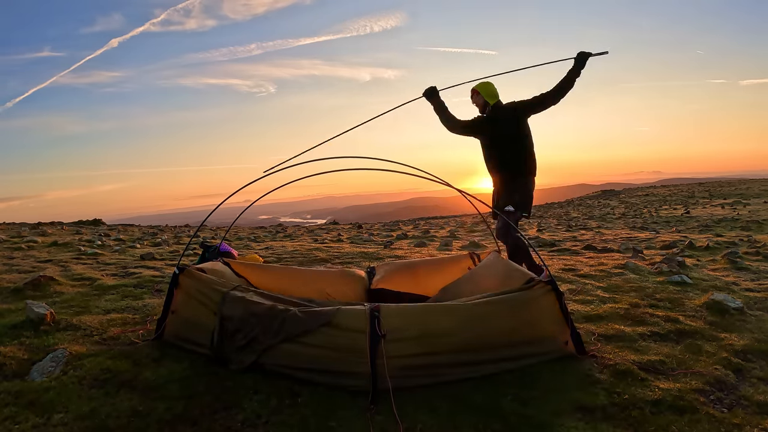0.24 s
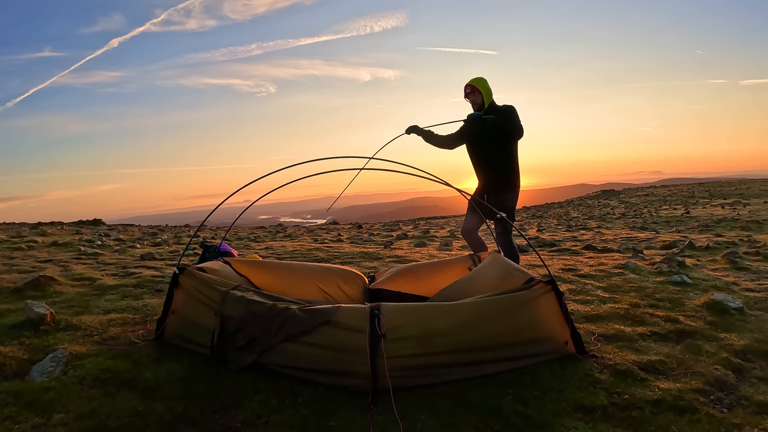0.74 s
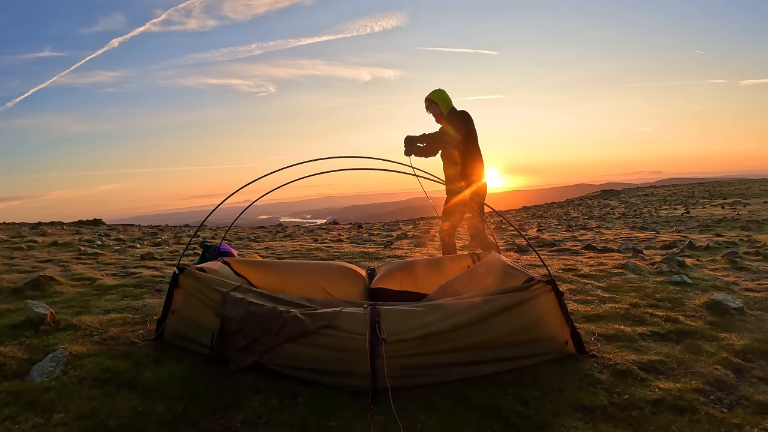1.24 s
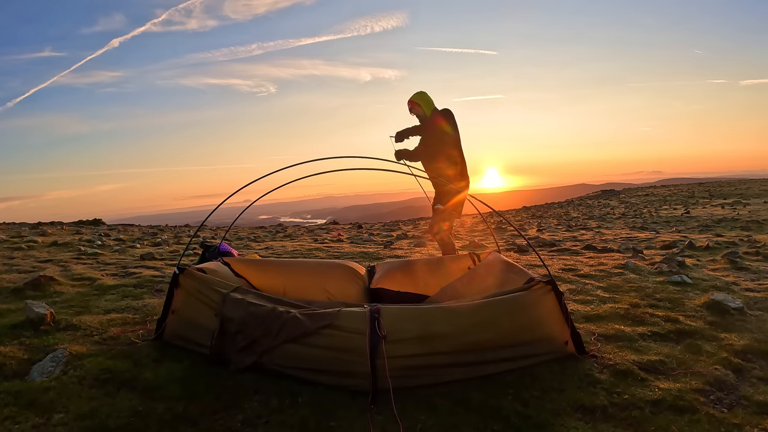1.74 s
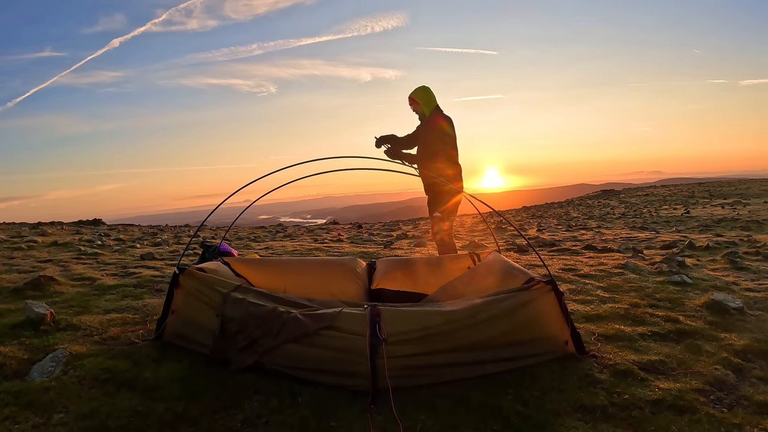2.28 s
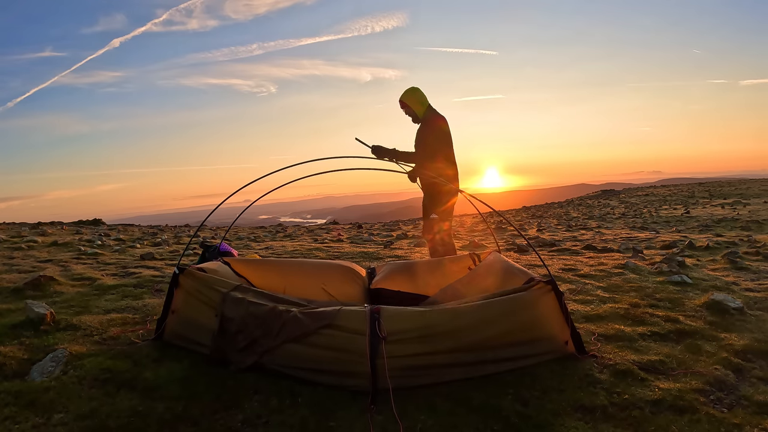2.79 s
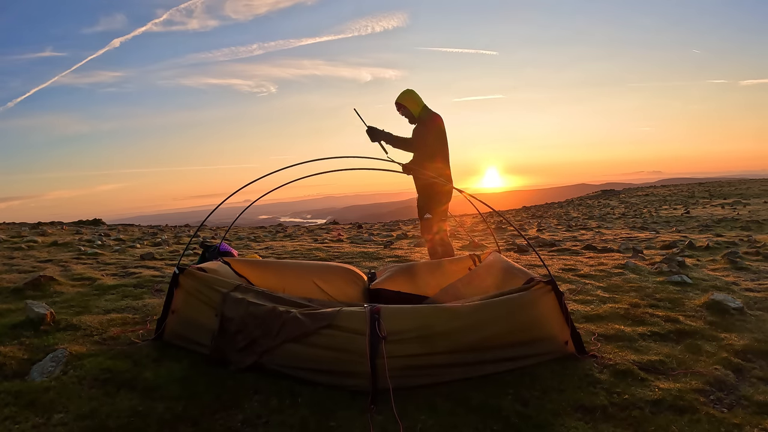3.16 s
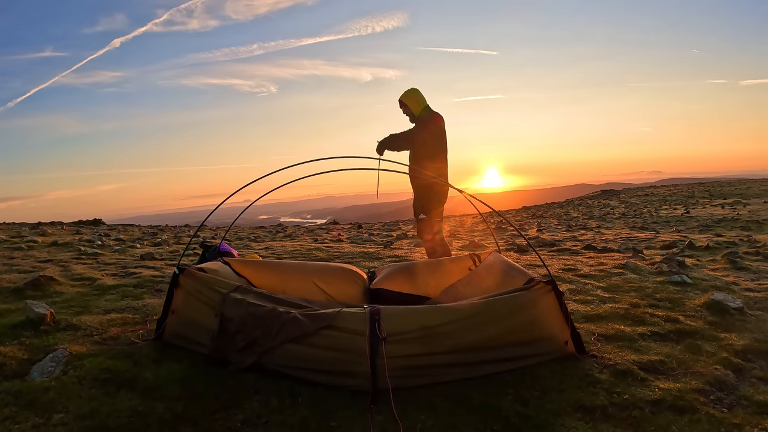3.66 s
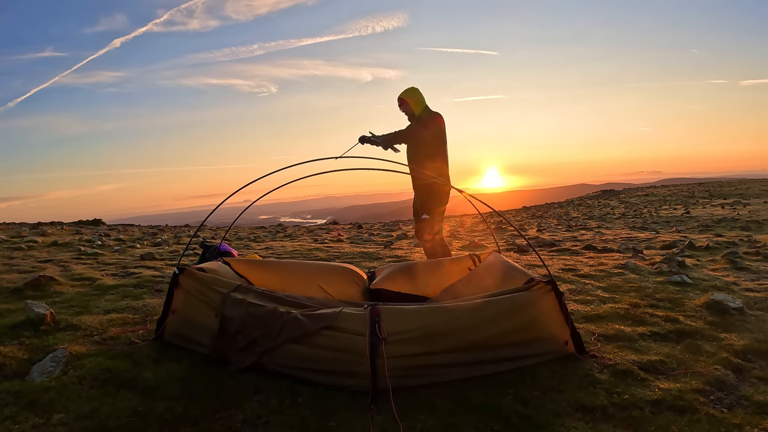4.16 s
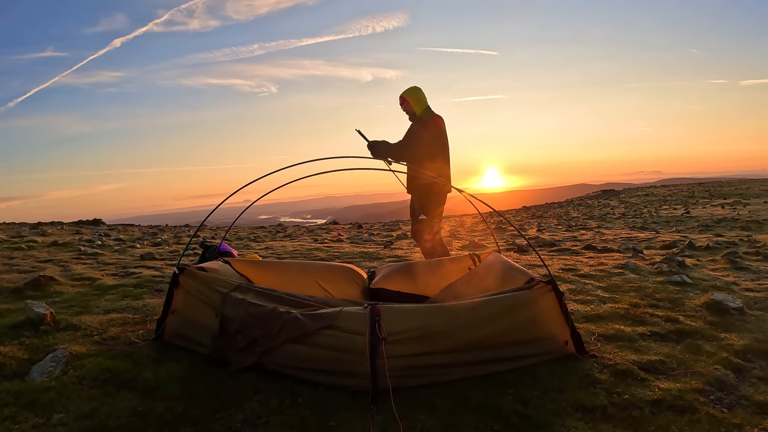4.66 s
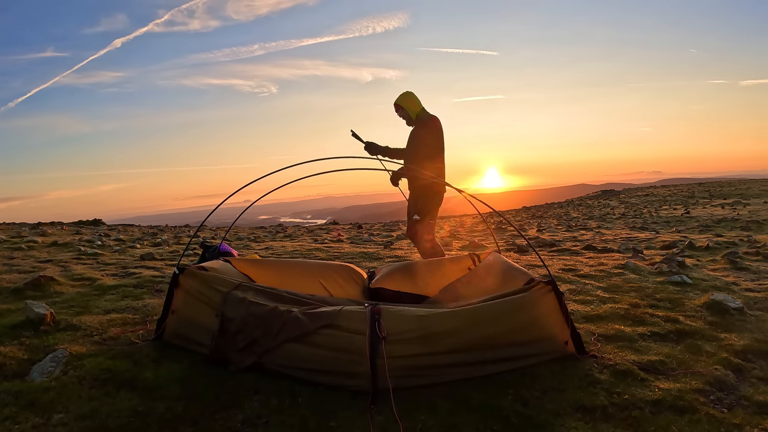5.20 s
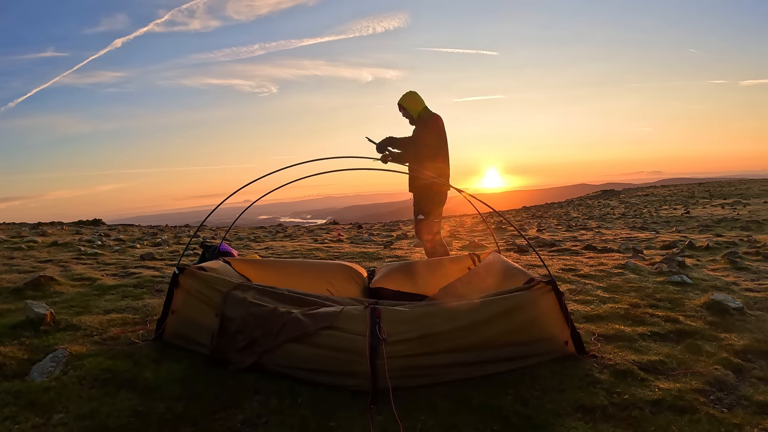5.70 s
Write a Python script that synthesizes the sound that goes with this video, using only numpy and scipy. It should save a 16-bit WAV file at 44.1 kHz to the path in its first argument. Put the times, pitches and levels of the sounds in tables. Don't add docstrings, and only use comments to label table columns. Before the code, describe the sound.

Bright, dry clicks of hollow metal tubes knocking together outdoors, growing busier towards the end, with lumpy wind rumble on the microphone and small bird whistles.

```python
import sys
import numpy as np
from scipy import signal
from scipy.fft import rfft, irfft
from scipy.io import wavfile
from scipy.ndimage import uniform_filter1d

SR = 44100
rng = np.random.default_rng(int(sys.argv[2]) if len(sys.argv) > 2 else 0)


def persist_wave(psi):
    counts = np.round(np.clip(psi, -1, 1) * 32767).astype(np.int16)
    wavfile.write(sys.argv[1], SR, np.atleast_2d(counts).T)


def amplitude_ratio(level_db):
    exponent = np.asarray(level_db, float) / 20
    return 10 ** exponent


N = 261954

# (time [s], peak level [dB], half length [s], left-right [dB])
GUSTS = [(0.015, -25, 0.059, -2), (0.158, -24, 0.045, -4.5), (0.286, -26.5, 0.074, -7),
         (0.575, -24.5, 0.24, -3.5), (0.864, -25.5, 0.046, -6), (0.994, -30.5, 0.091, -4.5),
         (1.198, -33, 0.15, -4), (1.473, -33, 0.12, -2), (1.818, -28.5, 0.057, 0), (1.967, -28, 0.059, -5),
         (2.124, -27.5, 0.052, -3), (2.218, -35, 0.06, -1), (2.567, -37, 0.079, -3),
         (3.006, -43.5, 0.34, -1), (3.314, -37, 0.038, 1), (3.583, -28, 0.047, -3),
         (3.734, -33.5, 0.076, -1), (4.028, -28, 0.11, -2.5), (4.232, -31, 0.068, 3),
         (4.415, -23, 0.09, -4.5), (4.67, -41, 0.24, 5), (4.958, -23, 0.056, -4.5), (5.19, -29, 0.05, -1),
         (5.317, -21.5, 0.079, -4.5), (5.377, -23, 0.023, -3), (5.483, -20, 0.094, -4),
         (5.617, -23.5, 0.058, -6.5), (5.681, -24, 0.03, -1), (5.801, -24.5, 0.044, -7),
         (5.895, -23, 0.048, -7.5)]
# (time [s], pitch [Hz], peak level [dB])
EDDIES = [
    (0.264, 152, -21.5),
    (1.833, 146, -34),
    (1.946, 164, -19),
    (1.256, 200, -28),
    (4.238, 92, -21.5),
    (4.45, 88, -25),
    (5.365, 134, -23),
    (5.448, 146, -9),
]
# (frequency [Hz], level [dB per Hz])
BUFFET_COLOUR = [(24, -70), (40, -45), (56, -14), (67, 0.5), (96, 7.5), (270, -6), (446, -25), (632, -32),
                 (981, -34), (1350, -33.5), (1500, -42), (1950, -39), (3300, -120)]
# (frequency [Hz], level [dB per Hz])
HISS_COLOUR = [(210, -42), (350, -3), (453, -3), (700, -4), (877, -4.5), (1210, -1), (2230, -6), (2940, -8),
               (3510, -11.5), (4920, -3.5), (7490, -4.5), (9690, -11.5), (10700, -25.5), (15200, -32),
               (16500, -37.5)]
# (time [s], level [dB])
RUSTLE = [(0.0, -43.5), (0.15, -51), (1.09, -53), (1.54, -52), (1.7, -56.5), (1.95, -58), (2.2, -54),
          (2.91, -55), (3.09, -59.5), (3.8, -53.5), (4.33, -56.5), (4.68, -56.5), (4.88, -52.5),
          (5.06, -72), (5.29, -52.5), (5.49, -53), (5.62, -61.5), (5.94, -55.5)]
# (frequency [Hz], likeness [0-1])
PORT_LIKENESS = [(60, 0.54), (300, 0.27), (640, 0.17), (1400, 0.33), (3100, 0.17), (6800, 0.65),
                 (15000, 0.1)]
# (frequency [Hz], left-right [dB])
PORT_LEAN = [(60, -13), (640, -5.5), (2000, -1.5), (5000, -1), (12000, 1.5)]
# (frequency [Hz], phase [radians])
PORT_LEAD = [(260, -1.3), (1200, -0.29), (2900, -0.86), (5000, -0.58), (10600, -0.46), (13000, -1.8)]
# (frequency [Hz], width [Hz], depth [0-1])
HOUSING_DIPS = [
    (3470, 240, 1),
    (3990, 120, .9),
]
# (frequency [Hz], level [dB], decay over 60 dB [s])
LOW_MODES = [(1140, -14, 0.022), (1602, -9.5, 0.023), (2100, 3.5, 0.0056), (2563, 3, 0.012),
             (2894, -4.5, 0.019), (3340, -18, 0.0078)]
# (frequency [Hz], level [dB], decay over 60 dB [s])
HIGH_MODES = [(3750, -12.5, 0.005), (4370, 2.5, 0.007), (4650, -6, 0.025), (5224, -0.5, 0.013),
              (5500, 3, 0.018), (6540, 6.5, 0.01), (6050, 7, 0.0075), (6970, 8, 0.0054), (7470, -2, 0.02),
              (7430, -19, 0.013), (7650, -48, 0.0054), (8800, -9, 0.0032), (9300, 7, 0.0093),
              (10400, -35, 0.0058), (11520, 3, 0.0089), (11600, -1, 0.0072), (14300, -4, 0.006),
              (14900, -27, .006)]
# (time [s], length [s], rms level [dB], favoured ring [Hz], low modes relative [dB])
SCRAPES = [(0.0, 0.057, -54.5, 960, 15.5), (0.0, 0.039, -54, 1244, 17.5), (0.0, 0.037, -59.5, 2680, 22.5),
           (4.868, 0.013, -59.5, 1090, 12), (1.113, 0.059, -62, 1200, 8), (4.442, 0.068, -38.5, 7500, -26),
           (5.418, 0.0075, -70, 3750, 12.5), (0.058, 0.07, -46, 7000, -5), (1.651, 0.041, -49, 1900, 4),
           (2.137, 0.021, -36.5, 3150, 1.5), (2.15, 0.02, -34.5, 6070, -11), (2.153, 0.017, -41, 3030, 3),
           (2.174, 0.018, -39.5, 5150, -10), (2.193, 0.039, -45.5, 4560, -6.5),
           (2.976, 0.074, -48, 5800, -11), (3.588, 0.064, -48.5, 2950, 1.5), (4.464, 0.027, -45, 5800, -25),
           (4.789, 0.1, -44.5, 6500, -41), (4.862, 0.11, -45.5, 6200, -12),
           (4.966, 0.09, -41.5, 6500, -7.5), (5.328, 0.021, -46, 5840, -3.5),
           (5.435, 0.022, -46.5, 8200, -24)]
# (time [s], peak level [dB], favoured ring [Hz], low modes relative [dB], chatter length [ms])
CLACKS = [(.0847, -18, 7640, -29, 1.4), (1.5828, -16, 6800, -8, 2.4), (1.6572, -21, 2000, 0, 4.7),
          (1.6722, -18.5, 2100, 19, 1.9), (2.1127, -3, 4500, -11, 1.3), (2.1708, -13.5, 7200, -1.5, 1.6),
          (2.3843, -7.5, 5530, -18, 2.5), (2.6205, -11, 4310, -11.5, 2.4), (2.6682, -12.5, 4300, -13, 2.2),
          (2.83, -10.5, 5430, -18.5, 1.1), (3.4286, -9, 6150, -9.5, 1.5), (3.6015, -15.5, 2830, 0, 3.5),
          (3.7428, -3.5, 5800, -17.5, 2.9), (4.2006, -5.5, 7140, -9.5, 1.37), (4.453, -5, 5830, -24, 3.1),
          (4.4657, -14, 2970, 1, 1.3), (4.5304, -2.5, 7120, -18, 1.06), (4.8327, -9, 5600, -21.5, 1.5),
          (4.8503, -5, 5500, -20.5, 1.6), (4.9957, 2, 6170, -21, 0.97), (5.0206, -8, 5200, -21.5, 1.46),
          (5.0511, 9, 6850, -27.5, .8), (5.3427, -8.5, 5230, -23.5, 1.6), (5.673, -21.5, 2300, -4, 0.97)]
# (time [s], peak level [dB], favoured ring [Hz])
TINKS = [(.129, -27.5, 6930), (1.3632, -33, 6260), (1.6333, -30.5, 5800), (1.692, -29, 6050),
         (2.118, -10, 4300), (2.329, -32, 7360), (2.4, -27, 5800), (2.4317, -25.5, 5260),
         (2.5748, -27.5, 6100), (2.6533, -25, 4970), (3, -39, 7600), (3.0033, -27, 5940),
         (3.025, -23, 7040), (3.6766, -24, 5650), (3.762, -19.5, 7240), (3.8337, -30.5, 6170),
         (4.4708, -16.5, 9000), (4.563, -27, 7560), (4.5959, -20.5, 6460), (4.8886, -24, 6000),
         (4.9194, -23, 6600), (4.9324, -19.5, 5200), (4.953, -28, 6700), (4.973, -31, 6000),
         (5.069, -52, 7300), (5.3354, -30, 4800), (5.355, -28, 5210), (5.448, -25.5, 5800),
         (5.6, -27, 7700), (5.9148, -22.5, 5160)]
# (time [s], peak level [dB], favoured ring [Hz])
TAPS = [(0.3419, -32.5, 1170), (1.7054, -49, 1120), (1.747, -27, 2250), (1.806, -39, 2180),
        (1.8843, -37.5, 2250), (1.9223, -36, 2130), (1.972, -34, 2220), (3.6414, -22.5, 1590),
        (4.519, -32, 2370), (5.275, -39, 1230), (5.829, -22.5, 2230)]
# (time [s], peak level [dB], favoured ring [Hz], low modes relative [dB])
REBOUNDS = [(1.585, -12, 6740, -13.5), (1.6703, -21, 2100, 16), (2.1646, -10.5, 3100, 10),
            (2.1565, -18, 5230, -16), (2.199, -30, 7300, -20), (2.3869, -3.5, 5860, -19),
            (2.3893, -13.5, 5700, -16), (2.6228, -12, 6140, -17), (2.6705, -13, 5550, -14),
            (2.833, -19, 1430, 0), (2.838, -28, 6000, -11), (2.9807, -27, 5640, -23),
            (2.985, -30, 5130, -20), (3.0093, -27, 6200, -25), (3.0249, -28, 1640, 16),
            (3.604, -15.5, 5430, -13), (3.7455, -6.5, 6950, -15), (3.7543, -18, 7200, -25),
            (3.7567, -20, 7200, -25), (4.2028, -7.5, 2370, 8), (4.2205, -28, 7000, -20),
            (4.4539, -3.5, 7250, -16.5), (4.458, -10, 5800, -22), (4.5324, -15, 2490, -7),
            (4.854, -11, 5500, -13.5), (5.277, -27.5, 1200, 16), (4.8123, -27, 6640, -22),
            (5.001, -16, 6300, -18), (5.0558, -16, 5300, -19), (5.344, -3, 6770, -24),
            (5.346, -15, 5240, -25), (3.4302, -14.5, 4200, -8), (2.137, -20, 5680, -6),
            (2.1505, -20, 6100, -6), (4.9974, -13, 9300, -12), (4.8345, -20, 2900, -5),
            (4.4725, -20, 9000, -12), (1.658, -24, 2120, 10)]
# (start [s], end [s], centre [Hz], width [Hz], rms level [dB])
SWISH = (.62, .785, 1380, 260, -47)
# (time [s], pitch [Hz], rms level [dB])
BIRD_CALLS = [
    [(1.528, 6000, -56), (1.54, 7000, -54), (1.552, 6560, -46), (1.565, 6750, -47), (1.58, 7100, -49),
     (1.59, 6500, -60)],
    [(3.227, 5850, -44), (3.246, 7100, -35.5), (3.253, 6470, -36), (3.259, 7300, -43), (3.271, 6600, -33),
     (3.283, 7100, -44), (3.292, 6480, -33), (3.299, 5100, -52)],
    [(3.374, 5700, -45), (3.392, 6600, -38), (3.41, 6230, -37), (3.43, 7100, -55), (3.445, 7300, -44),
     (3.45, 6230, -50)],
    [(4.595, 6050, -45), (4.62, 6700, -34), (4.628, 6260, -36), (4.649, 7230, -37.5), (4.66, 5600, -39)],
]
# (start [s], end [s], level against bass [dB])
SEAMS = [
    (1.76, 1.84, -36),
    (4.25, 4.414, -31),
    (5.1, 5.268, -33),
    (5.357, 5.663, -44),
    (5.735, 5.828, -35),
]


def evened(x):
    return x / np.sqrt(np.mean(x ** 2) + 1e-20)


def read(points, hz):
    f, value = np.transpose(points)
    return np.interp(np.log(hz + 1), np.log(f + 1), value)


def add(mix, s, sound):
    part = mix[max(round(s * SR), 0):][:len(sound)]
    part += sound[:len(part)]


def butter(x, order, hz, kind):
    return signal.sosfilt(signal.butter(order, hz, kind, fs=SR, output="sos"), x)


def tukey_fade(x, share):
    return x * signal.windows.tukey(len(x), share)


def gusts(t):
    lull_db, lull_pan_db = -42, -5.5
    s, db, half, pan_db = np.transpose(GUSTS)[:, :, None]
    power = amplitude_ratio(db) ** 2 * np.exp(-((t - s) / np.maximum(half, .01)) ** 2 * 1.52)
    lull = amplitude_ratio(lull_db) ** 2
    total = power.sum(0) + lull
    return 10 * np.log10(total), ((power * pan_db).sum(0) + lull * lull_pan_db) / total


def port_noise(size, level_db, pan_db, patch_db, flicker_db):
    hop = size // 4
    frames = N // hop + 5
    hz = np.fft.rfftfreq(size, 1 / SR)[:, None]
    t = np.arange(frames) * hop / SR
    a, b, c, d, patches = rng.standard_normal((frames, len(hz), 5)).T
    patches = uniform_filter1d(patches, size=9, axis=0)
    patches = evened(uniform_filter1d(patches, size=6, axis=1))
    flicker = evened(uniform_filter1d(rng.standard_normal(frames), size=3))
    same = np.clip(read(PORT_LIKENESS, hz), -1, 1)
    left = a + 1j * b
    right = same * left + np.sqrt(1 - same ** 2) * (c + 1j * d)
    db = level_db(hz, t) + patch_db * patches + flicker_db * flicker
    half_pan = pan_db(hz, t) / 2
    z = np.array([left, right]) * amplitude_ratio(np.array([db + half_pan, db - half_pan])) / np.sqrt(size)
    return signal.istft(z, nperseg=size, noverlap=size - hop)[1][:, :N]


def wind():
    def level_db(hz, t):
        gust_db = gusts(t)[0]
        reach_db = 0.33 * (gust_db + 29) * np.log2(np.clip(hz / 130, 1, 5))
        return read(BUFFET_COLOUR, hz) + gust_db + 20.5 + reach_db

    def pan_db(hz, t):
        return gusts(t)[1] * np.clip(hz / 220, .4, 1.2)

    eddies = np.zeros(N)
    t = np.arange(-700, 700) / SR
    for at, hz, db in EDDIES:
        bell = np.exp(-(t * hz / 0.73) ** 2)
        add(eddies, at + t[0], amplitude_ratio(db) * bell * np.sin(2 * np.pi * hz * t))
    buffeting = port_noise(1024, level_db, pan_db, patch_db=1.36, flicker_db=1.58)
    return buffeting + eddies * amplitude_ratio(np.array([[2.0], [-2.0]]))


def hiss():
    def level_db(hz, t):
        high = np.clip((hz - 3000) / 1200, 0, 1)
        top = np.clip((hz - 9500) / 2000, 0, 1)
        gust_db = gusts(t)[0] + 30.8
        rustle_db = np.interp(t, *np.transpose(RUSTLE)) + 55
        low_db = -32 + 0.21 * gust_db + 0.32 * rustle_db
        ducked = sum(np.clip(np.minimum(t - a, b - t) / .03, 0, 1) * (db > -40) for a, b, db in SEAMS)
        high_db = rustle_db - 36.0 - 5.5 * ducked
        fizz_db = top * (5.5 + 0.13 * gust_db - 0.94 * rustle_db)
        return read(HISS_COLOUR, hz) + (1 - high) * low_db + high * high_db + fizz_db

    def pan_db(hz, t):
        return read(PORT_LEAN, hz) + 0 * t

    return port_noise(512, level_db, pan_db, patch_db=2.48, flicker_db=0.74)


def ring(modes, favoured_hz, top_db, chance):
    hz, db, t60 = np.transpose(modes)[:, :, None]
    detune, weight = chance[:, :len(modes), None]
    t = np.arange(1300) / SR
    level_db = db + top_db * np.clip(hz / 4000 - 2, 0, 1) + 2.5 * weight - 60 * t / t60
    shape = amplitude_ratio(level_db) * np.sin(2 * np.pi * hz * (1 + 0.04 * detune) * t)
    inside = hz[0, 0] * .75 < favoured_hz < hz[-1, 0] * 1.13
    favoured = inside * amplitude_ratio(11.0 - 60 * t / .01) * np.sin(2 * np.pi * favoured_hz * t)
    return shape.sum(0) + favoured


def tube(contacts, hz, low_db, chance):
    top_db = np.clip(-1.17 * (low_db + 14.5), -15, 9)
    high = signal.fftconvolve(contacts, ring(HIGH_MODES, hz, top_db, chance))
    low = signal.fftconvolve(contacts, ring(LOW_MODES, hz, top_db, chance))
    high = butter(high, 3, 3600, "highpass")
    low = butter(low, 4, 0.83 * min(hz, 1550), "highpass")
    return evened(high) + amplitude_ratio(low_db) * evened(low)


def poles(*groups):
    out = np.zeros(N)
    for play, rows in groups:
        noises = rng.standard_normal((len(rows), 5000))
        chances = rng.standard_normal((len(rows), 2, 20))
        for row, noise, chance in zip(rows, noises, chances):
            add(out, *play(row, noise, chance))
    mesh_hz, top_db = 10200, -14
    hardness = 6.0 * abs(uniform_filter1d(abs(out), size=200)) + 0.072
    top = butter(out * hardness, 4, mesh_hz, "highpass")
    return butter(out, 8, mesh_hz, "lowpass") + amplitude_ratio(top_db) * top


def scrape(row, noise, chance):
    s, length, db, hz, low_db = row
    noise = noise[:round(length * SR)]
    grip = amplitude_ratio(1.8 * evened(uniform_filter1d(noise[::-1], size=60)))
    bite = np.clip(length / 0.18, .3, 1.2)
    stroke = np.sin(np.pi * np.linspace(0, 1, len(noise)) ** bite) ** 0.45
    contacts = noise * np.sqrt(abs(noise)) * grip * abs(stroke)
    tail_makeup = np.sqrt(1 + 1300 / len(noise))
    return s, amplitude_ratio(db) * tube(contacts, hz, low_db, chance) * tail_makeup


def knock(row, noise, chance, loose_db=0):
    s, db, hz, low_db, chatter_ms = row
    rub_db, rub_s, rattle_s = -5, .11, .16
    rattle_db = -32.5 - .55 * db + loose_db
    t = np.arange(len(noise)) / SR - .02
    after = np.maximum(t, 0)
    onset = 1 - np.exp(-after / 0.00066)
    chatter = np.exp(-(after / (max(chatter_ms, .3) / 1000)) ** 0.91) * onset
    rattle = amplitude_ratio(rattle_db + np.where(t < 0, rub_db + 60 * t / rub_s, -60 * t / rattle_s))
    contacts = noise * abs(noise) / 2 * chatter + noise * rattle
    contacts[np.searchsorted(t, .0004)] += 2.13
    sound = tube(contacts, hz, low_db + 6.0, chance)
    loudest_db = -1.5
    return s + t[0], amplitude_ratio(min(db, loudest_db)) * sound / abs(sound).max()


def swish():
    start, end, hz, width, db = SWISH
    noise = rng.standard_normal(round(.3 * SR))[:round((end - start) * SR)]
    band = butter(noise, 2, [hz - width / 2, hz + width / 2], "bandpass")
    out = np.zeros(N)
    add(out, start, amplitude_ratio(db) * tukey_fade(evened(band), .5))
    return out


def bird():
    out = np.zeros(N)
    for call in BIRD_CALLS:
        s, hz, db = np.transpose(call)
        t = np.arange(s[0], s[-1], 1 / SR)
        pitch = uniform_filter1d(np.interp(t, s, hz), size=150, mode="nearest")
        level = amplitude_ratio(uniform_filter1d(np.interp(t, s, db), size=100, mode="nearest"))
        whistle = np.sin(2 * np.pi * np.cumsum(pitch) / SR)
        add(out, s[0], tukey_fade(np.sqrt(2) * level * whistle, .1))
    return out


def rebound(row, noise, chance):
    chatter_ms = 0.53
    return knock((*row, chatter_ms), noise[:1600], chance, loose_db=-40)


def seams(x):
    tick_hz, tick_at_s = 375, 4.3017
    out = np.zeros_like(x)
    bass = uniform_filter1d(abs(uniform_filter1d(x, size=60)), size=70)
    for start, end, db in SEAMS:
        span = slice(round(start * SR), round(end * SR))
        turns = tick_hz * (np.arange(N)[span] / SR - tick_at_s)
        comb = sum(np.cos(2 * np.pi * k * turns) * np.sqrt(np.cos(k / 24.5)) for k in range(10, 38))
        out[:, span] = amplitude_ratio(db) * tukey_fade(comb, .4) * bass[:, span]
    return out


def silence_faint(x, floor_db, wander_db):
    hz, t, z = signal.stft(x, SR, nperseg=1024)
    hz = hz[:, None]
    blocks = np.repeat(rng.standard_normal((len(t), 22)), 24, axis=1)[:, :len(hz)].T
    blocks = evened(uniform_filter1d(blocks, size=5, axis=1)) * np.clip(hz / 10000, 0, 1)
    margin_db = 20 * np.log10(abs(z).max(0) + 1e-12) - floor_db - wander_db * blocks
    keep = np.where(hz > 2500, np.clip(margin_db / 2, 0, 1), 1)
    return signal.istft(z * keep, SR, nperseg=1024)[1][:, :N]


def scene():
    tinks = [(*row, -13.5, 1.74) for row in TINKS]
    taps = [(*row, -0.5, 1.3) for row in TAPS]
    near = poles((knock, CLACKS + tinks + taps), (scrape, SCRAPES)) + swish()
    air = wind() + hiss()
    near = near + poles((rebound, REBOUNDS))
    hz = np.fft.rfftfreq(N, 1 / SR)
    lean = amplitude_ratio(read(PORT_LEAN, hz) / 2) * np.exp(.5j * read(PORT_LEAD, hz))
    near = irfft(rfft(near) * np.array([lean, 1 / lean]), N)
    return near + bird() * amplitude_ratio(np.array([[2.5], [-2.5]])) + air


def low_pass(x):
    return signal.sosfilt(signal.butter(12, 16670, fs=SR, output="sos"), x)


def record(dry):
    hz = np.fft.rfftfreq(N, 1 / SR)
    cut_hz = 82
    wind_cut = 1 / np.sqrt(1 + (cut_hz / (hz + 1)) ** 24) + .001
    dips = np.ones(len(hz))
    for f, width, depth in HOUSING_DIPS:
        dips = dips * (1 - np.clip(depth, 0, 1) / (1 + 2j * (hz - f) / width))
    response = dips * wind_cut * (hz < 16600)
    mix = irfft(rfft(dry + seams(dry)) * response, N)
    return low_pass(silence_faint(mix, floor_db=-91.0, wander_db=7.0))


dry = scene()
out = record(dry)
persist_wave(out)
```